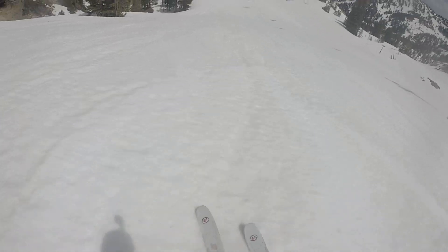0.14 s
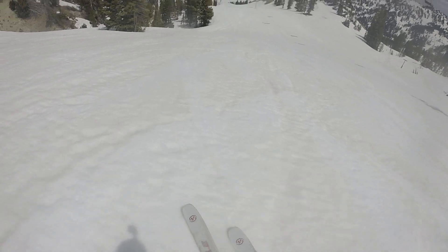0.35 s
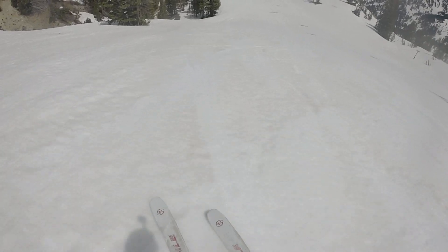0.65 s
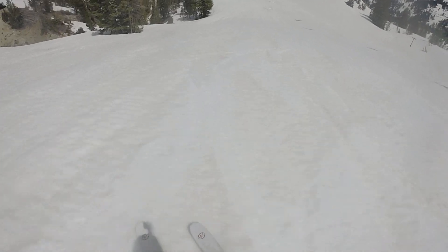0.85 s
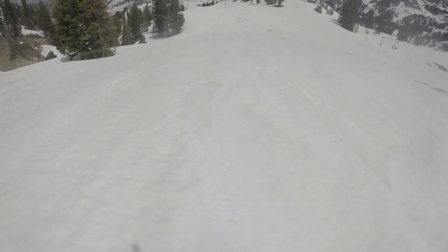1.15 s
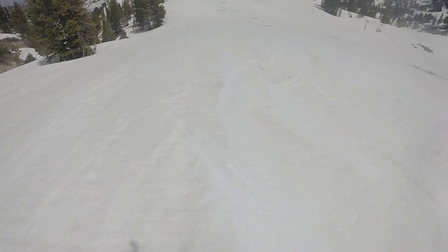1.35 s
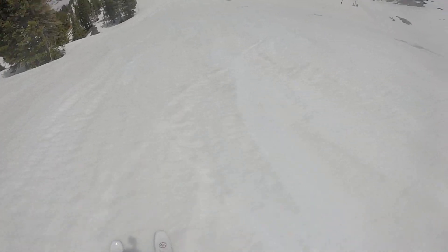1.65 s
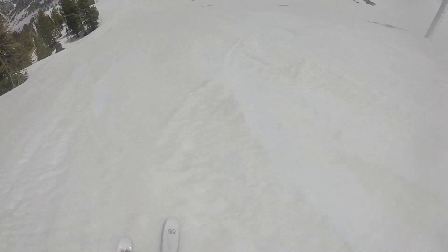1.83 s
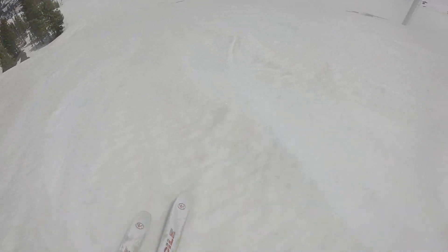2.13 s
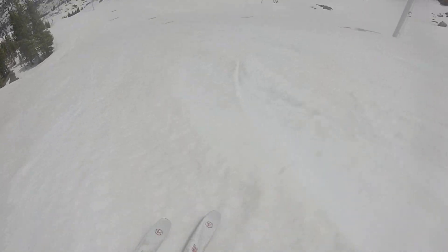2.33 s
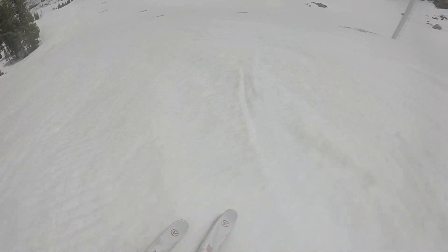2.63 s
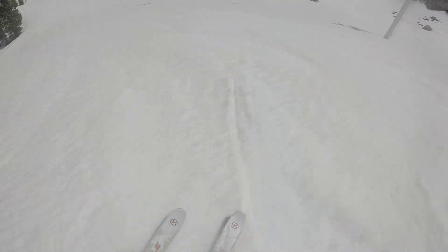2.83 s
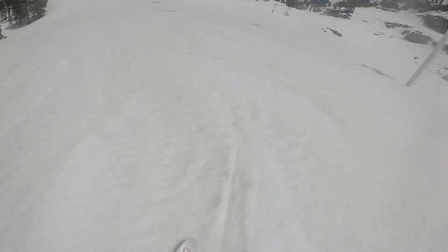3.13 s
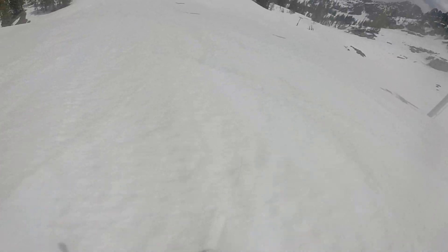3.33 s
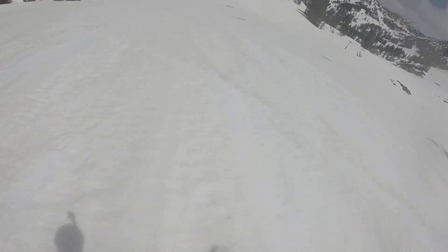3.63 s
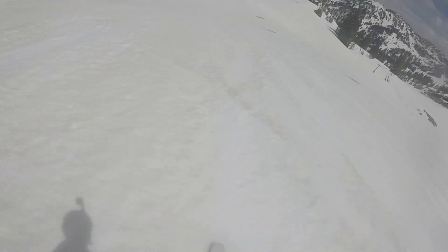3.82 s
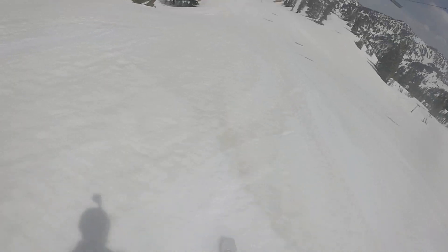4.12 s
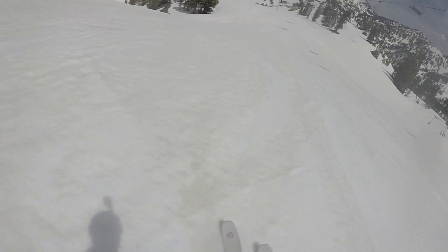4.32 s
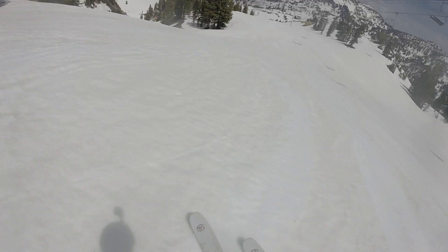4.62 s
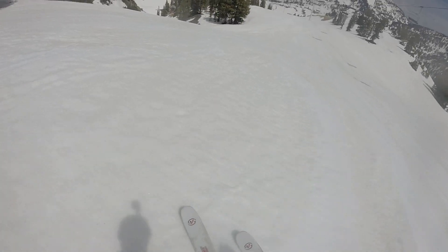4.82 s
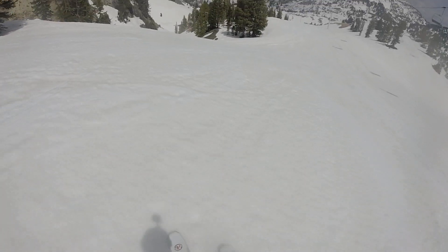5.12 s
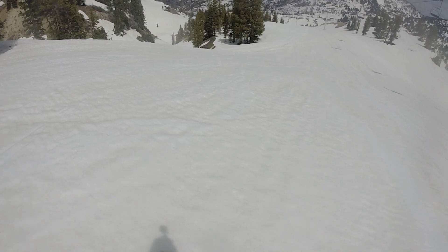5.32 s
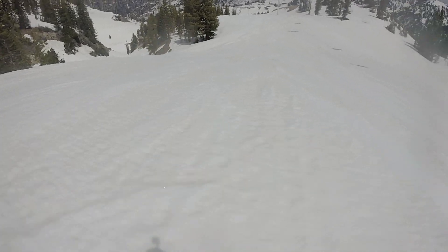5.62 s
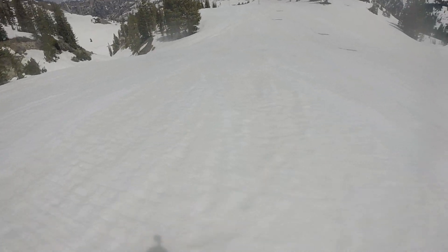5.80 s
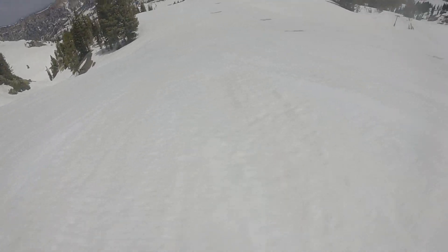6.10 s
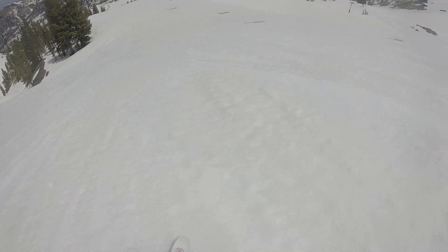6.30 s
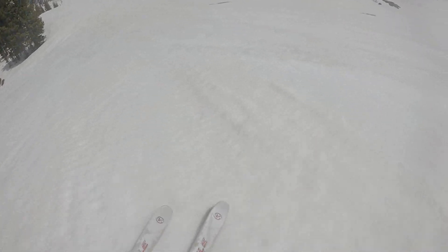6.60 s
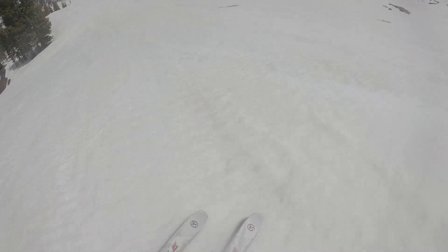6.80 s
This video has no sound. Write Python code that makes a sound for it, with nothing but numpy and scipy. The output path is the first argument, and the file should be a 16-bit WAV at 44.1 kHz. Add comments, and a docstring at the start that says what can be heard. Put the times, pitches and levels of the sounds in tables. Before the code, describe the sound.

Skis hiss through wet snow in four turns over low wind rumble, while a plastic camera case knocks and clacks.

```python
"""Slush hisses up over a low rumble of air as skis carve four turns through wet spring snow.
The hiss swells as each turn loads the edges and fades as they are released; once an edge catches and rasps.
All is heard from a camera in a plastic case worn by the skier: the air stream buffets the case, drops tick
on it, and bumps make it knock and clack in its mount, which thumps and rings briefly."""
import sys
import numpy as np
from scipy import signal
from scipy.fft import rfft, irfft, next_fast_len
from scipy.io import wavfile
from scipy.ndimage import uniform_filter1d, minimum_filter1d, map_coordinates

SR = 44100
rng = np.random.default_rng(int(sys.argv[2]) if len(sys.argv) > 2 else 0)


def pcm_store(signal):
    """Save signal as 16-bit PCM."""
    levels = np.round(np.clip(np.atleast_2d(signal), -1, 1) * 32767)
    wavfile.write(sys.argv[1], SR, levels.astype(np.int16).T)


N = 306495

# turns: full edge load at t/s, hold/s, scrape level/dB, spray level/dB, mist level/dB,
# build-up of the load for scrape and spray/(dB/s), build-up of the load for mist/(dB/s)
CARVED_TURNS = [(0.474, 0.0058, -50.5, -45.5, -57, 9, 19.5), (2.25, 0.39, -47, -46.5, -55, 25.5, 27),
                (4.708, 0.028, -44, -39, -53.5, 17, 14.5), (6.54, 0.4, -49.5, -50, -55, 21.5, 29)]
# hard bumps that shove the whole camera: t/s, level/dB
HARD_BUMPS = [(2.122, -14.5), (2.259, -14.5), (2.447, -26), (2.478, -9.5), (4.164, -22), (4.555, -22),
              (6.259, -19.5), (6.62, -23)]


def skis():
    """Friction noise: loaded edges scrape and throw spray and mist; the soles rumble over rippled snow."""
    # spectra of the four layers: f/Hz, relative density level/dB
    scrape_spectrum = [(200, -33), (600, -1.5), (850, -1.5), (1100, -3), (1700, -3), (2500, -8.5),
                       (5000, -37), (15000, -35)]
    spray_spectrum = [(500, -18), (1300, -6), (2300, 1.5), (3200, 3.5), (5000, -5.5), (6200, -6.5),
                      (8000, -21.5), (15000, -77)]
    mist_spectrum = [(2500, -32), (5000, -17), (6800, 3), (8000, -1.5), (10000, -4), (11500, -6.5),
                     (15000, -13)]
    sole_spectrum = [(40, 7), (80, 1), (130, 0.5), (190, -1), (265, 1), (340, -5.5), (450, -7), (700, -9.5),
                     (1200, -10.5), (4000, -51)]
    _, _, scrape_peaks, spray_peaks, mist_peaks, edge_builds, mist_builds = np.transpose(CARVED_TURNS)
    scrape_db = carve(scrape_peaks, edge_builds, glide_db=-60.5, db_per_load_db=1.07)
    spray_db = carve(spray_peaks, edge_builds, glide_db=-58.5, db_per_load_db=1.166)
    mist_db = carve(mist_peaks, mist_builds, glide_db=-66.5, db_per_load_db=0.98)
    sole_db = -54 + 0.096 * (scrape_db - scrape_db.mean())
    ripples, lumps, gush = wobble(30), crunches(per_s=8.3, small_db=-13), gushes()
    scrape = slush(scrape_spectrum, grains_per_s=300, grain_db=-4.5, patchy_db=1.16)
    scrape *= amp(scrape_db + 2.6 * ripples) * (1 + lumps)
    spray = slush(spray_spectrum, grains_per_s=900, grain_db=-9.5, patchy_db=1.42)
    spray *= amp(spray_db + 0.84 * ripples) * (1 + 0.13 * lumps + gush)
    mist = slush(mist_spectrum, grains_per_s=2500, grain_db=-8, patchy_db=1.5)
    mist *= amp(mist_db + 0.42 * ripples)
    sole = unit(coloured(rng.standard_normal(N), lambda hz: along(sole_spectrum, hz)))
    sole *= amp(sole_db + 1.5 * wobble(16)) * (1 + gush)
    return scrape + spray + mist + sole


def carve(peaks_db, builds_db_per_s, glide_db, db_per_load_db):
    """Incoherent sources add in power: a layer's level/dB is the flat glide plus each turn's edge load."""
    # the skis go light as they change edges: t/s, dip in level/dB
    edge_changes = [(1.0, 3), (1.25, 3.5), (3.63, 4), (5.85, 1.5)]
    release_s, light_s = 0.42, 0.11  # time for the load to shed 10 dB; half length of a dip
    t = np.arange(N) / SR
    power = amp(glide_db) ** 2
    for (s, hold_s, *_), peak_db, build in zip(CARVED_TURNS, peaks_db, builds_db_per_s):
        building = build * np.maximum(s - t, 0)
        releasing = 10 * (np.maximum(t - s - hold_s, 0) / release_s) ** 2
        power = power + amp(peak_db - db_per_load_db * (building + releasing)) ** 2
    light_db = sum(dip_db * np.exp(-((t - s) / light_s) ** 2) for s, dip_db in edge_changes)
    return 10 * np.log10(power) - light_db


def slush(spectrum, grains_per_s, grain_db, patchy_db):
    """Shot noise of collapsing wet crystals: a patchy rush plus single grains, heard through the case."""
    grains = (rng.random(N) < grains_per_s / SR) * rng.standard_normal(N)
    cells = signal.stft(rng.standard_normal(N) + amp(grain_db) * unit(grains), nperseg=512)[2]
    patches = uniform_filter1d(rng.standard_normal(cells.shape), size=10, axis=0)  # across frequency
    patches = uniform_filter1d(patches, size=8, axis=1)  # across time
    rush = signal.istft(cells * amp(patchy_db * unit(patches)), nperseg=512)[1][:N]
    return unit(coloured(rush, lambda hz: along(spectrum, hz) + case_db(hz)))


def crunches(per_s, small_db):
    """Amplitude modulation: the scrape jumps as lumps of snow give way, a few large and many small."""
    # large lumps crushed under an edge: t/s, relative level/dB
    large_lumps = [(1.128, 6.5), (2.095, -5), (2.52, -7), (2.6, -7), (4.69, -8), (4.76, -0.5), (5.05, 3.5),
                   (5.225, 2)]
    t = np.arange(SR // 10) / SR
    crush = (1 - np.exp(-t / 0.0016)) * amp(-60 * t / 0.13)
    swell = np.zeros(N)
    for s, db in large_lumps:
        add(swell, s, amp(db + 8) * crush)
    for when, smallness in rng.random((int(per_s * N / SR), 2)):
        add(swell, when * N / SR, amp(small_db - 17 * smallness) * crush)
    return swell


def gushes(rise_s=0.015, t60=0.37):
    """Exponential decay: each hard bump adds a fading share to the spray and to the rumble of the soles."""
    t = np.arange(SR // 2) / SR
    swell = np.zeros(N)
    for s, db in HARD_BUMPS:
        add(swell, s, amp(db + 3.5 - 60 * t / t60) * (1 - np.exp(-t / rise_s)))
    return swell


def knocks():
    """Impact excites modes: the case strikes its mount; harder blows are brighter, chatter and ring more."""
    # blows: t/s, knock level/dB, hardness (0 dull, 1 hard, above 1 harder still), thump level/dB
    blows = [(0.3739, -30, 1.53, -61), (1.6596, -13.5, 1.27, -18), (1.7671, -12.5, 1.43, -19),
             (1.8404, -11, 0.17, -31), (1.888, -41, 0, -58), (1.896, -38.5, .05, -48),
             (1.905, -39.5, 0.44, -41), (1.927, -50, 0.55, -32), (2.1479, -15, 0.5, -33.5),
             (2.2229, -31.5, 0.48, -32), (2.2549, -25.5, 0.46, -49), (2.2579, -17, 1.09, -21.5),
             (2.437, -37, 0.28, -30.5), (2.478, -28, 0.87, -25), (2.877, -37.5, 0.86, -41.5),
             (3.0031, -32.5, 1.2, -45), (3.235, -49, 1.3, -27), (3.748, -40, 0.67, -26.5),
             (3.757, -38.5, 0.57, -40), (3.993, -29.4, .1, -38), (4.1536, -48, 0, -26.5),
             (4.165, -8.9, 0.036, -23.5), (4.528, -10.5, 0, -22), (4.561, -49, .1, -31),
             (4.709, -35.5, 0.73, -35), (5.9116, -11, 1.25, -17.5), (6.026, -44.5, 0.32, -51),
             (6.2219, -48, 0, -31.5), (6.263, -49, 0.081, -40), (6.617, -38.5, 0.7, -24.5),
             (6.632, -30.5, 1.66, -57)]
    # spectra of a dull knock and of a hard clack: f/Hz, relative level/dB
    dull = [(50, -22), (170, -9.5), (400, -47.5), (600, -17.5), (900, 0), (1080, 0), (1400, 5), (1750, -12),
            (2100, -11), (2600, -21.5), (3600, -20.5), (4300, -36), (7000, -60), (15000, -65)]
    hard = [(50, -41), (170, -26.5), (420, -22), (700, -10), (1050, 0), (1430, -1), (1650, 1.5), (2000, 0),
            (2800, -5.5), (3600, -10), (4800, -24.5), (5400, -37), (8500, -46), (15000, -76)]
    # modes of the ringing mount and of the camera swaying on it: f/Hz, relative level/dB, t60/s
    mount_modes = [(1890, -27, 0.22), (2040, -14, 0.11), (2700, -16, 0.05), (3320, -42, 0.16)]
    sway_modes = [(259.9, -1, 0.12), (203, 5, 0.04), (132, 8.5, 0.015)]
    out = np.zeros(N)
    for s, db, hardness, thump_db in blows:
        colour = lambda hz: (1 - hardness) * along(dull, hz) + hardness * along(hard, hz)
        knock = contact(colour, chatter_db=-3.5 + 10 * hardness, t60=0.009, tail_db=-28.5, tail_t60=0.041)
        add(out, s, amp(db) * knock)
        add(out, s, amp(db - 5.8 * (1.5 - hardness)) * ring(mount_modes, rise_s=0.0013))
        # the load on the mount shifts its sway a little from blow to blow
        sway = [(hz * (1 + 0.018 * rng.standard_normal()), level, t60) for hz, level, t60 in sway_modes]
        add(out, s, -amp(thump_db - 3.5) * ring(sway, rise_s=0.00014))
    return out


def contact(colour_db, chatter_db, t60, tail_db, tail_t60, size=4096):
    """Source and filter: an impulse amid fading chatter, coloured, with the energy of 5 ms at rms 1."""
    t, hz = np.arange(size) / SR, np.fft.rfftfreq(size, 1 / SR)
    envelope = (1 - np.exp(-(t / 0.0017) ** 2)) * (amp(-60 * t / t60) + amp(tail_db - 60 * t / tail_t60))
    chatter = envelope * rng.standard_normal(size)
    touch = np.arange(size) == round(.0006 * SR)
    force = rfft(touch + amp(chatter_db) * chatter / np.linalg.norm(chatter))
    # broad humps in the force spectrum are evened out, so that like blows sound alike
    power = uniform_filter1d(uniform_filter1d(np.abs(force) ** 2, size=27), size=27)
    hit = irfft(force * minimum_phase(colour_db(hz) - 10 * np.log10(np.abs(power))))
    return hit * np.sqrt(.005 * SR / np.sum(hit ** 2))


def ring(modes, rise_s):
    """Superposition of damped modes after one blow; neighbouring modes start in opposite phase."""
    t = np.arange(SR // 3) / SR
    swings = [(-1) ** k * amp(db - 60 * t / t60) * np.sin(2 * np.pi * hz * t)
              for k, (hz, db, t60) in enumerate(modes)]
    return (1 - np.exp(-t / rise_s)) * sum(swings)


def jolts(hz=49.0, t60=0.094):
    """A heavily damped oscillator: each hard bump gives the camera one deep push."""
    out = np.zeros(N)
    for s, db in HARD_BUMPS:
        add(out, s, -amp(db) * ring([(hz, -0.5, t60)], rise_s=0.0097))
    return out


def splats():
    """Drop impact: thrown slush ticks on the case and takes on its resonances."""
    # drops that hit the case: t/s, level/dB
    drops = [(1.105, -43), (1.11, -42.5), (2.148, -27), (2.258, -31), (4.516, -41)]
    # spectrum of one drop: f/Hz, relative level/dB
    drop_spectrum = [(500, -30), (1300, 2), (2300, 3), (5000, -1.5), (8000, -15.5), (15000, -35)]
    colour = lambda hz: along(drop_spectrum, hz) + case_db(hz)
    out = np.zeros(N)
    for s, db in drops:
        add(out, s, amp(db) * contact(colour, chatter_db=6.0, t60=0.0083, tail_db=-28, tail_t60=0.031))
    return out


def rasps(slip_hz=1130, jitter=0.13):
    """Stick-slip friction: a loaded edge catches and slips for a moment at an unsteady rate."""
    # catches of the edge: t/s, length/s, level/dB
    catches = [(2.779, 0.032, -40.5), (2.822, 0.027, -42)]
    rate_hz = slip_hz * (1 + jitter * wobble(500))
    slips = np.sin(2 * np.pi * np.cumsum(rate_hz) / SR)
    grip = np.zeros(N)
    for s, length_s, db in catches:
        add(grip, s, amp(db) * np.sqrt(np.hanning(round(length_s * SR))))
    return grip * slips * amp(2.5 * wobble(300))


def wind():
    """Turbulent pressure: slow eddies press on the case as strongly as the air stream drives them."""
    # buffeting by the air stream: t/s, relative level/dB
    air_stream = [(0.0, -42), (0.08, -38), (0.71, -37.5), (1.01, -47.5), (1.76, -33.5), (1.84, -26),
                  (2.3, -28.5), (2.4, -45.5), (2.46, -25.5), (3.08, -45.5), (3.12, -35.5), (4.03, -39),
                  (4.31, -31.5), (4.51, -43), (4.55, -31.5), (5.5, -45.5), (5.98, -36), (6.95, -36.5)]
    # spectrum of the eddies: f/Hz, relative density level/dB
    eddy_spectrum = [(3, -13), (9, 2.5), (20, -1), (26, -1), (33, -10), (48, -19), (65, -30.5), (90, -31),
                     (200, -72), (600, -84)]
    buffet_db = np.interp(np.arange(N) / SR, *np.transpose(air_stream))
    eddies = coloured(rng.standard_normal(N), lambda hz: along(eddy_spectrum, hz))
    envelope = np.sqrt(uniform_filter1d(np.abs(signal.hilbert(eddies)) ** 2, size=8000))
    return amp(buffet_db + 2.5) * unit(eddies / envelope)


def case_db(hz):
    """Resonance: the case lifts some bands of outside sound and notches others; gives gain/dB."""
    # peaks and notches of the case: f/Hz, Gaussian width/Hz, gain/dB
    resonances = [(734, 59, -8), (1075, 67, 12), (1327, 93, 10.5), (1609, 99, 8), (1810, 29, -4),
                  (2064, 37, 4), (2297, 82, 7), (2464, 56, 4.5), (2867, 42, 5.5), (3460, 155, 5),
                  (4080, 58, -7.5), (4090, 70, 5), (4390, 50, 3), (4782, 166, 10), (4870, 25, -1),
                  (5250, 60, -1), (5750, 220, 5), (6600, 66, -8), (6840, 550, 5.5), (7180, 56, -2),
                  (8890, 290, 4.5), (10010, 450, 6), (11480, 150, -2), (12500, 382, 1.5)]
    return sum(db * np.exp(-.5 * ((hz - centre) / width) ** 2) for centre, width, db in resonances)


def amp(db):
    """Level/dB to amplitude ratio."""
    return 10 ** (np.asarray(db) / 20)


def unit(x):
    """Normalisation to rms 1."""
    return x / np.sqrt(np.mean(x ** 2) + 1e-20)


def along(points, hz):
    """Interpolation of (f/Hz, level/dB) points on a logarithmic frequency axis."""
    f, db = np.transpose(points)
    return np.interp(np.log(hz + 1), np.log(f + 1), db)


def wobble(knots_per_s):
    """Smooth random modulation: a spline through Gaussian knots."""
    knots = rng.standard_normal(int(N * knots_per_s / SR) + 4)
    return map_coordinates(knots, [np.arange(N) * knots_per_s / SR])


def coloured(x, gain_db):
    """Zero-phase filtering by a function that gives gain/dB at each f/Hz."""
    size = next_fast_len(N + SR // 2)
    hz = np.fft.rfftfreq(size, 1 / SR)
    return irfft(rfft(x, size) * amp(gain_db(hz)), size)[:N]


def minimum_phase(db):
    """Causality: folding the cepstrum gives the minimum-phase response with these gains."""
    cepstrum = irfft(np.log(amp(db)))
    half = len(cepstrum) // 2
    return np.exp(rfft(np.r_[cepstrum[0], 2 * cepstrum[1:half], np.zeros(half)]))


def add(track, s, sound):
    """Superposition of a sound on the track, s seconds in."""
    part = track[round(s * SR):][:len(sound)]
    part += sound[:len(part)]


def scene():
    """Pressures add linearly: snow, air and the rattling camera in one channel."""
    return (skis() + wind() + knocks() + splats() + jolts() + rasps())[None]


def record(dry):
    """Peak and band limiting: the gain ducks for knocks beyond full scale; the highest treble is cut."""
    top_hz, window = 15450, 91  # window in samples, about 2 ms
    needed = 1 / np.maximum(np.abs(dry[0]), 1)
    gain = uniform_filter1d(minimum_filter1d(needed, size=window), size=window)
    return coloured(dry[0] * gain, lambda hz: -120 * (hz > top_hz))[None]


dry = scene()
out = record(dry)
pcm_store(out)
```